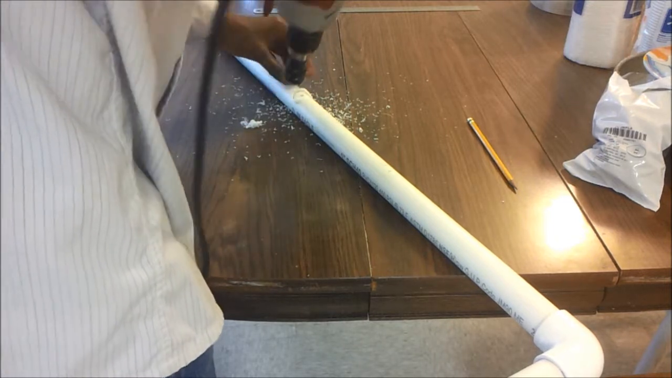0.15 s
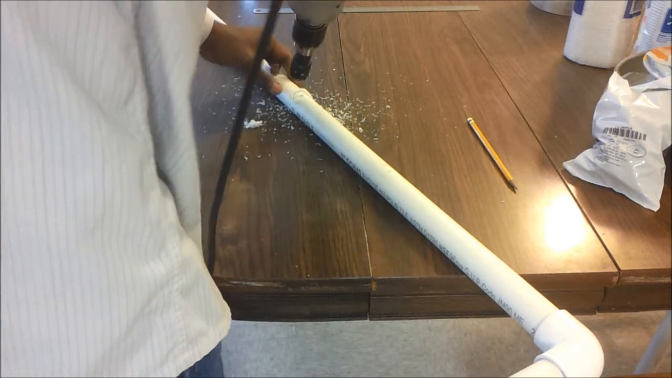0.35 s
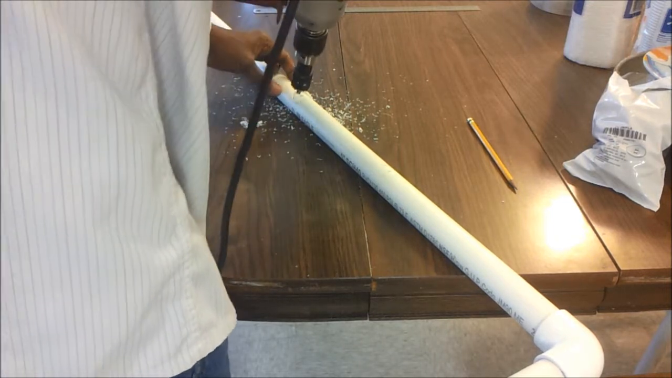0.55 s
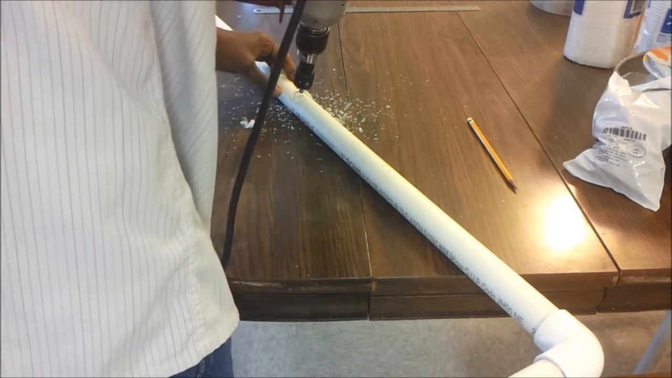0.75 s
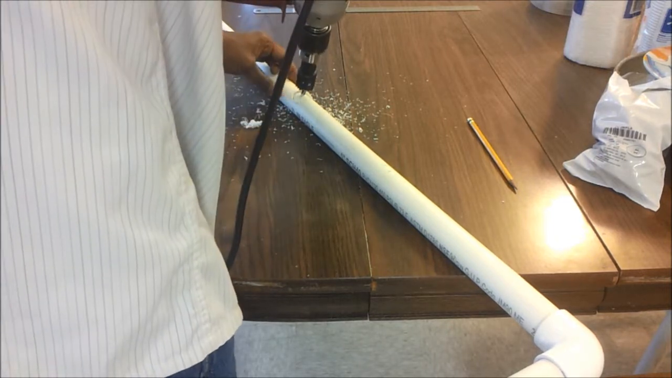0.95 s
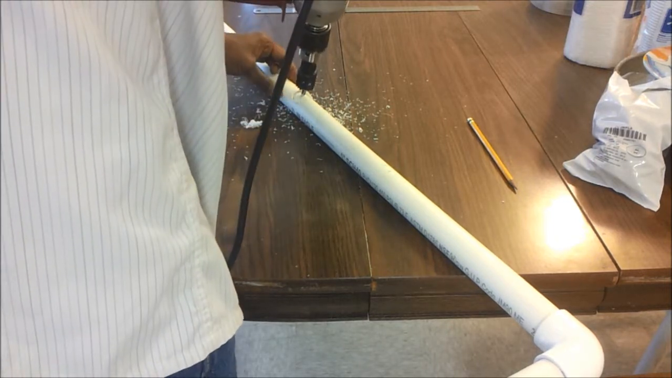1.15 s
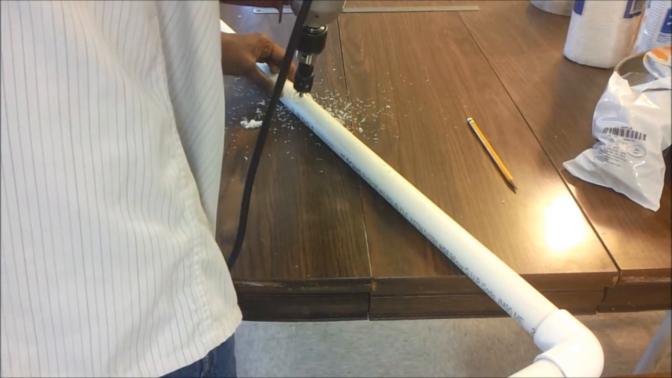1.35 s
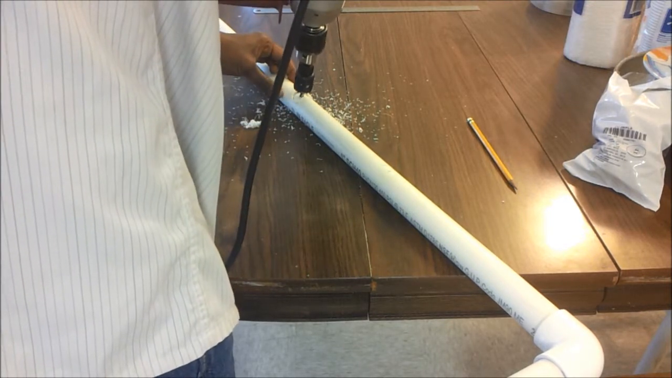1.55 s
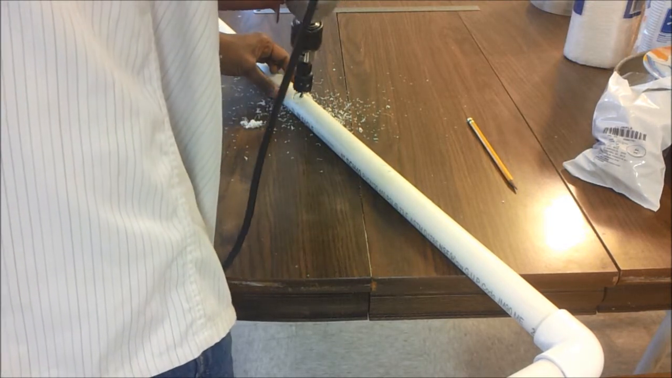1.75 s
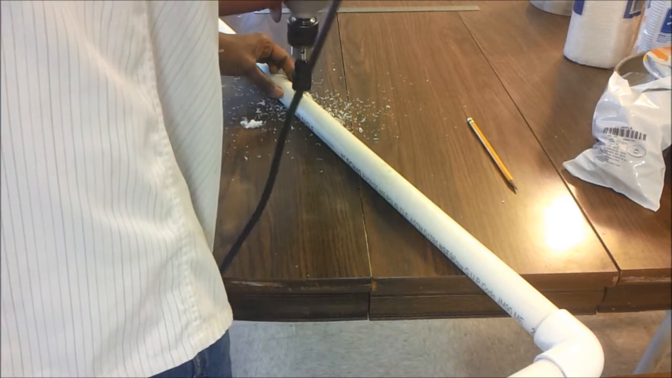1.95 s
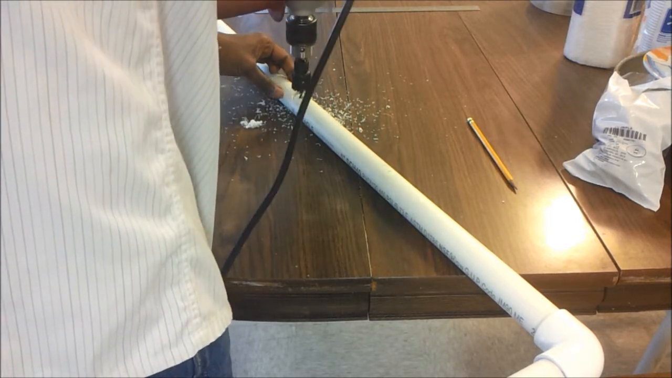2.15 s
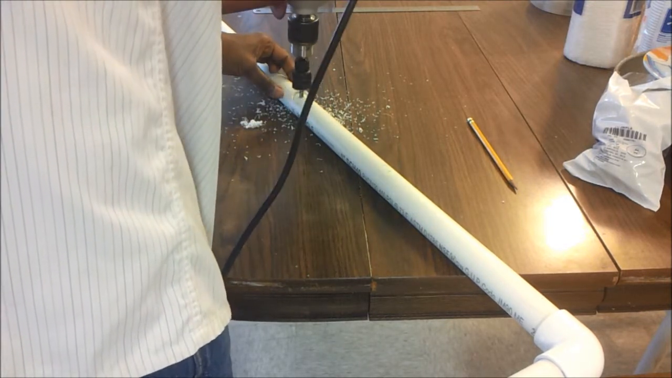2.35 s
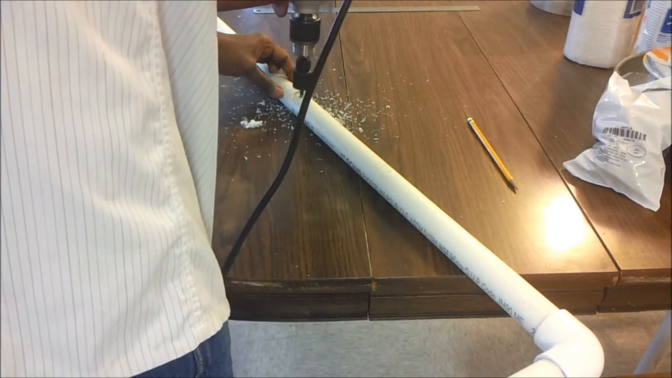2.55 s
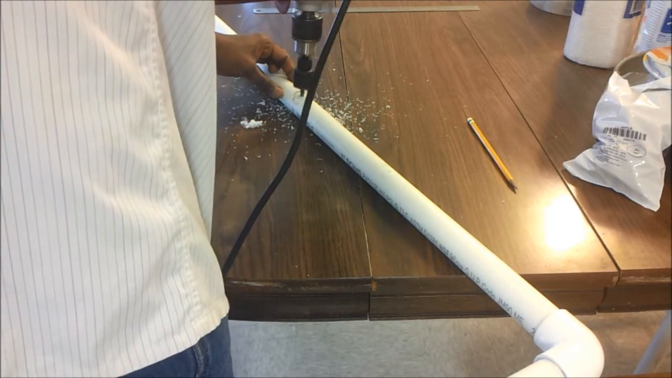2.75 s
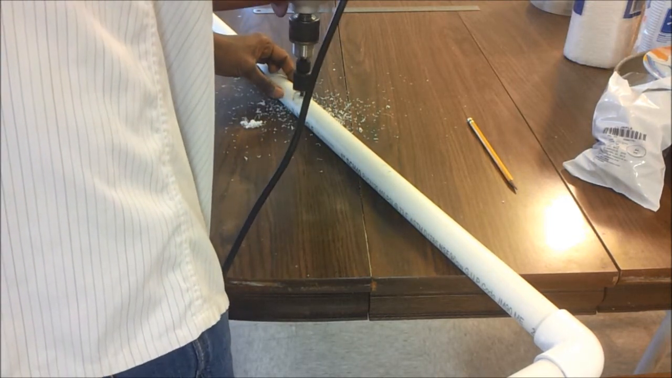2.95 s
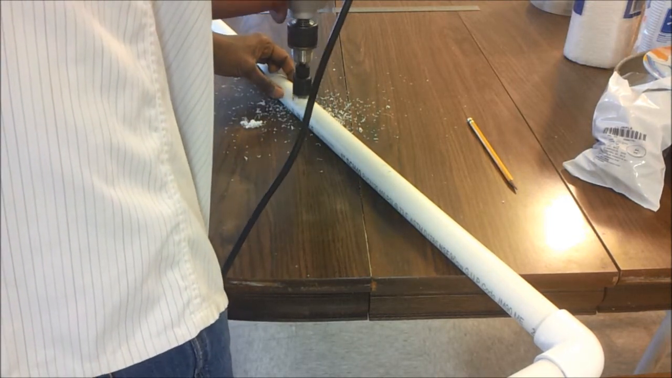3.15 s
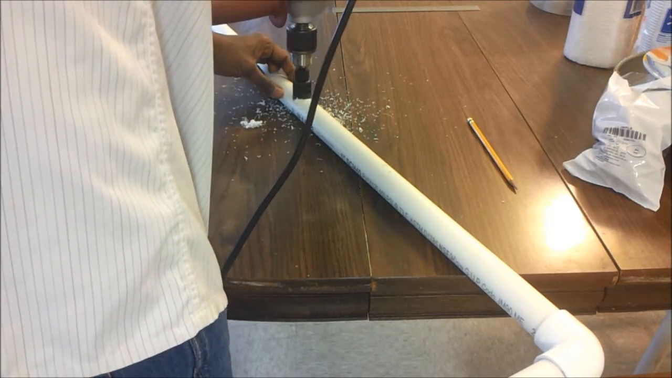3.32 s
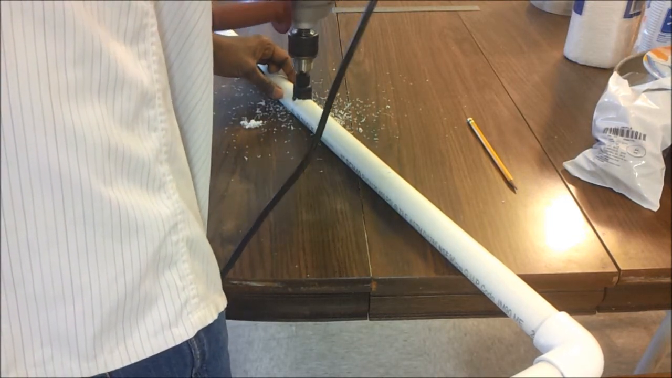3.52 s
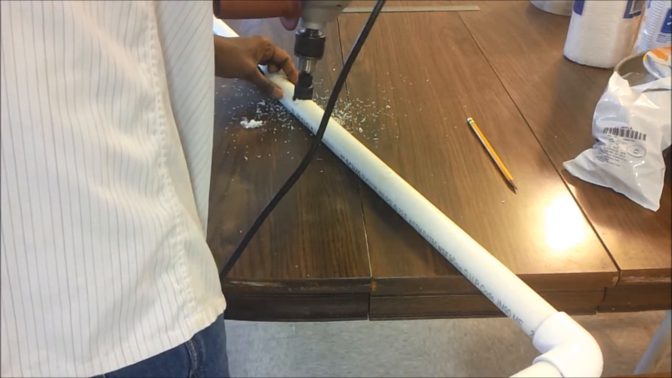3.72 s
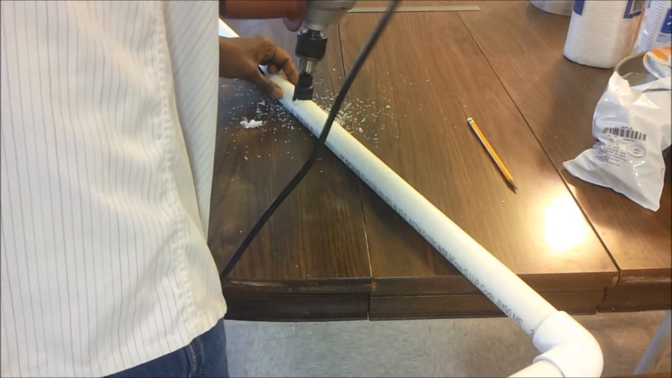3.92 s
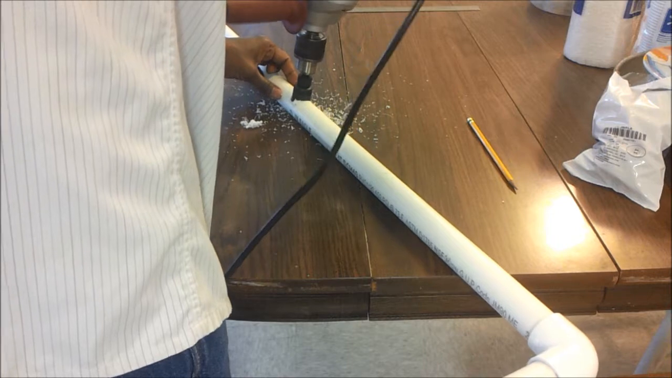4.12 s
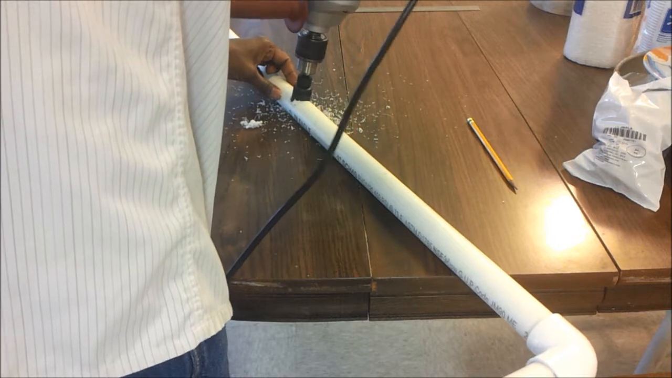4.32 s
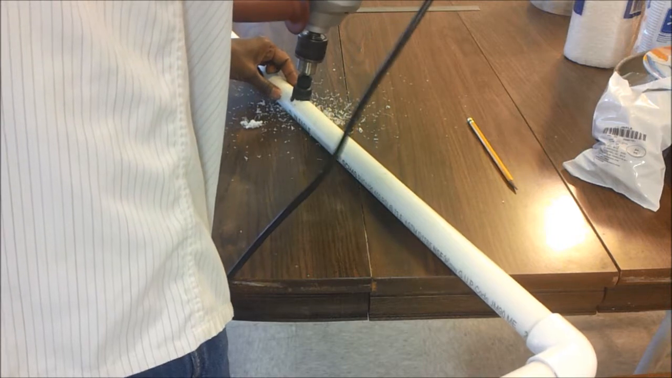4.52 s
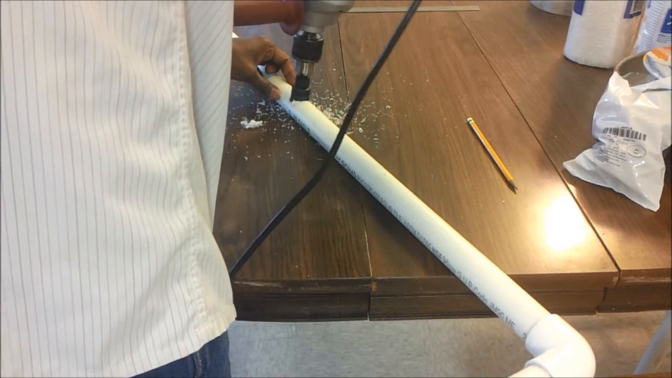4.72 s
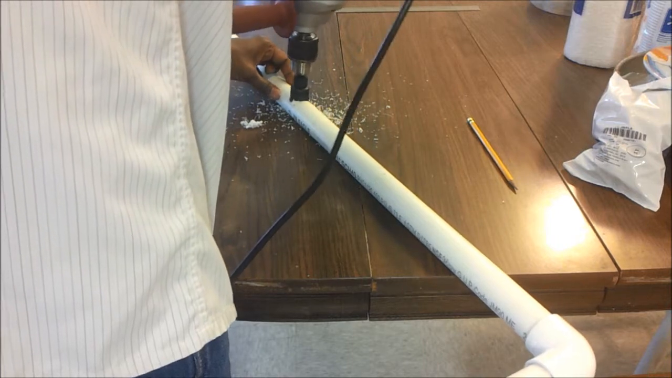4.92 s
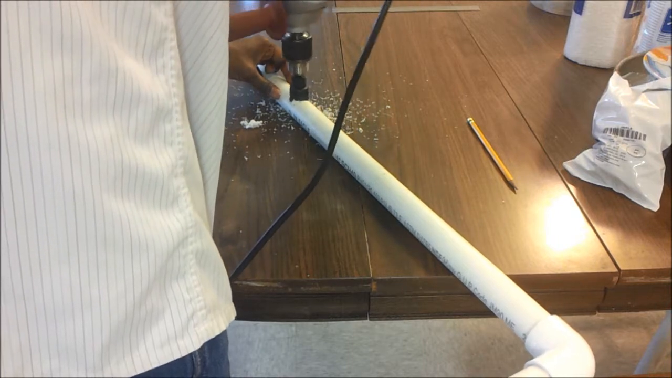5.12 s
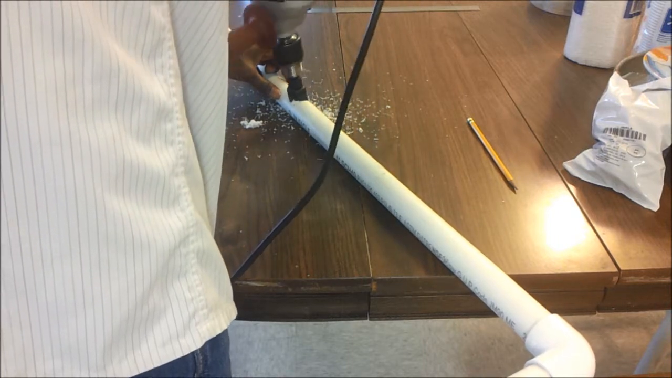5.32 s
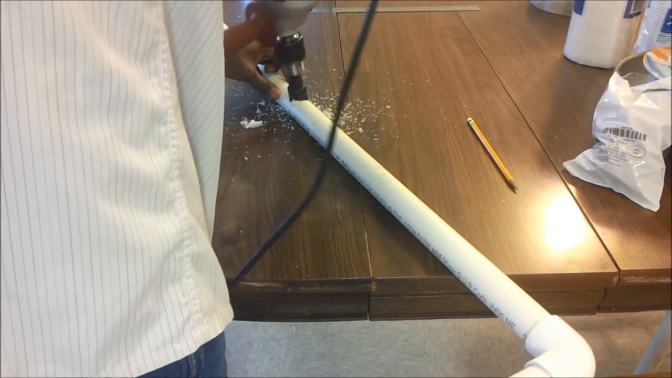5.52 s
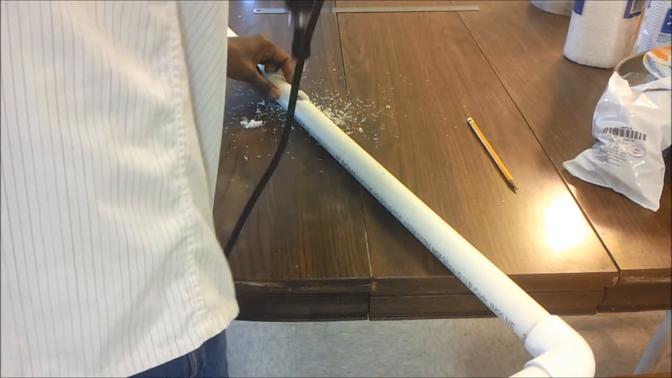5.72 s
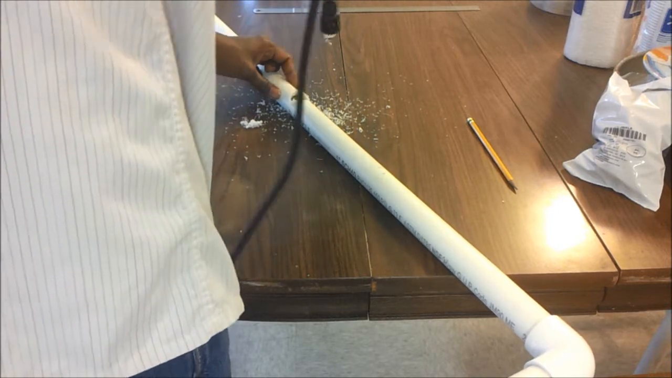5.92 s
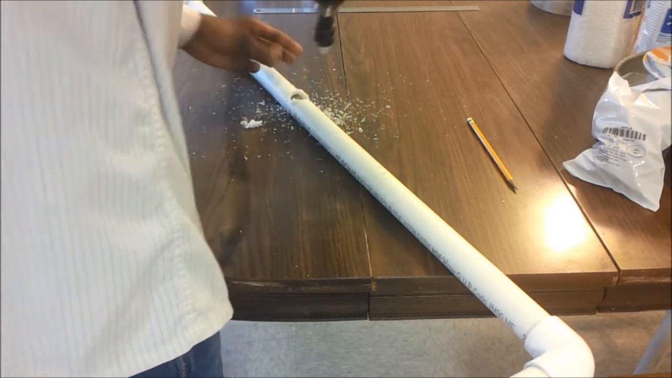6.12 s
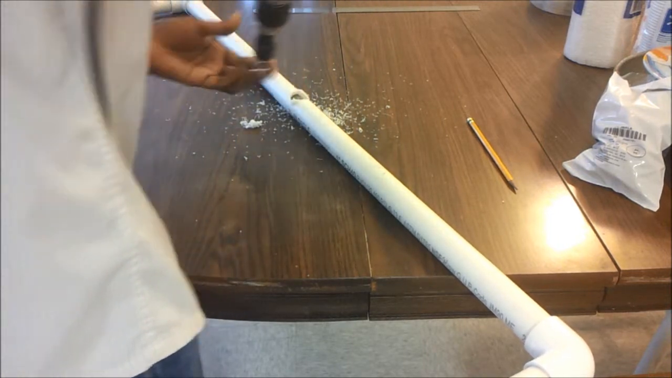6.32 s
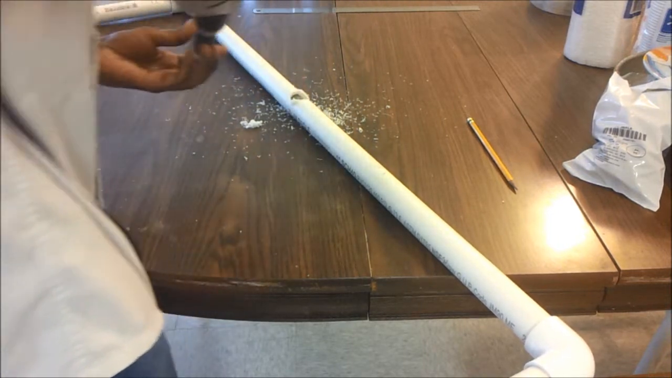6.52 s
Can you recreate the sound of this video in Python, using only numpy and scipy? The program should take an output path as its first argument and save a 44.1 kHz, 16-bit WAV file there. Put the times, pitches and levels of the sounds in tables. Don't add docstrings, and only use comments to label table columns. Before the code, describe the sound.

After two quiet seconds of faint bumps, a corded drill whines up, saws raspily through plastic pipe, then coasts down to a sharp trigger click.

```python
import sys
import numpy as np
from scipy import signal
from scipy.fft import rfft, irfft
from scipy.io import wavfile

SR = 44100
rng = np.random.default_rng(int(sys.argv[2]) if len(sys.argv) > 2 else 0)


def linear_from_db(decibels):
    return 10 ** (np.asarray(decibels, float) / 20)


def waveform_to_disk(signal):
    frames = np.transpose(np.atleast_2d(signal))
    scaled = np.clip(frames, -1, 1) * 32767
    samples = np.round(scaled).astype(np.int16)
    wavfile.write(sys.argv[1], SR, samples)


N = 289737
T = np.arange(N) / SR
MAINS_HZ = 60.36
POWER_ON_S, BITE_S, POWER_OFF_S = 2.0908, 3.18, 5.4
POWERED = np.clip((POWER_OFF_S - T) / 0.016, 0, 1)
CUTTING = POWERED * np.clip((T - BITE_S) / 0.034, 0, 1)
DRIVEN = np.clip((POWER_OFF_S + 0.1 - T) / 0.064, 0, 1)


def evened(x):
    return x / np.sqrt(np.mean(x ** 2) + 1e-20)


def read(points, hz):
    f, value = np.transpose(points)
    return np.interp(np.log(hz + 1), np.log(f + 1), value)


def curves(rows):
    s, *columns = np.transpose(rows)
    return [np.interp(T, s, c) for c in columns]


def body(spectrum, modes):
    hz = abs(np.fft.fftfreq(8192, 1 / SR))
    lift = 1 + sum((linear_from_db(db) - 1) / (1 + (2 * (hz - f) / w) ** 2) for f, w, db in modes)
    gain = linear_from_db(np.maximum(read(spectrum, hz), -90)) * np.maximum(lift, 1e-3)
    minimum_phase = np.exp(np.conj(signal.hilbert(np.log(gain))))
    taps = np.fft.ifft(minimum_phase).real[:4096]
    return taps / np.linalg.norm(taps)


def through(x, taps):
    return signal.oaconvolve(x, taps)[:N]


def band_noise(low_hz, high_hz, count):
    sos = signal.butter(2, [low_hz, high_hz], "band", fs=SR, output="sos")
    return signal.sosfilt(sos, rng.standard_normal(count))


def drift(hz):
    count = N // 64 + 2
    z = rfft(rng.standard_normal(count))
    slow = irfft(z / (1 + (np.fft.rfftfreq(count, 64 / SR) / hz) ** 2), count)
    return evened(np.interp(T, np.arange(len(slow)) * 64 / SR, slow - slow.mean()))


def grit(spread_db):
    return evened(rng.standard_normal(N) * linear_from_db(spread_db * np.minimum(rng.exponential(1, N), 5)))


def add(mix, s, sound):
    part = mix[round(s * SR):][:len(sound)]
    part += sound[:len(part)]


def span(start, end):
    settle_s = .021
    return np.clip(np.minimum(T - start, end - T) / settle_s + .5, 0, 1)


def law(tooth_hz, knee_hz, db, db_per_decade):
    return db + db_per_decade * np.log10(np.minimum(tooth_hz / knee_hz, 1))


def blend(driven, coasting):
    return DRIVEN * driven + (1 - DRIVEN) * coasting


# f/Hz, density/dB per Hz
FLOOR = [(15, -34), (25, -41.5), (117, -5.5), (332, -5.5), (369, -11), (612, -14.5), (1020, -20),
         (1100, -27), (1360, -23.5), (1600, -33), (1780, -25), (2320, -26.5), (14600, -31.5)]


def floor():
    level_db = -58.5
    noise = through(rng.standard_normal(N), body(FLOOR, [(320, 130, 0.5)]))
    low = signal.sosfilt(signal.butter(2, 600, fs=SR, output="sos"), noise)
    return linear_from_db(level_db) * (noise + low * (linear_from_db(1.0 * drift(4.6)) - 1))


# f/Hz, width/Hz, lift/dB
PIPE = [(426.6, 16, 7.4), (514, 26, 3.1), (904, 71, 3), (1118, 34, 4.4), (1560, 38, 1.7), (2080, 55, 1.9)]
# f/Hz, level/dB
JOLT = [(150, -28.5), (300, -4), (450, -4), (900, -4.5), (1550, -.5), (2200, -5), (3000, -44), (5000, -78)]
# t/s, level/dB, brightness share/0-1, t60/s
JOLTS = [
    (0, -66, 0.6, 0.95),
    (3.196, -20, 0.93, 0.21),
    (3.327, -15.5, 1, 0.12),
    (3.437, -23.5, 0.13, 0.16),
    (4.697, -16, 0.32, 0.37),
    (5.459, -31, 0.03, 0.18),
    (5.619, -68, .05, 0.096),
    (6.322, -44, 0.86, 0.33),
    (6.323, -38, 0.88, 0.056),
]
# t/s, level/dB, f/Hz
BUMPS = [(0.231, -55, 170), (0.359, -49, 282), (0.598, -56.5, 325), (0.668, -53, 320), (1.11, -58, 320),
         (1.249, -58, 220), (1.422, -57, 229), (1.689, -62, 300), (5.41, -40, 55), (3.441, -26, 430),
         (5.469, -31.5, 422), (5.52, -42.5, 403), (5.868, -43, 2950), (5.97, -46, 2950)]
# t/s, level/dB
NUDGES = [(0.1246, -49.5), (0.2666, -57), (0.715, -56), (0.858, -57), (1.054, -50), (1.3535, -50.5),
          (1.565, -59), (1.6696, -70), (1.8552, -59)]


def pipe():
    out, t = np.zeros(N), T[:SR // 4]
    ring = body(JOLT, [(f, w, db + 0.5) for f, w, db in PIPE])
    shake = body(RATTLE, HOUSING)
    for s, db, bright, t60 in JOLTS:
        blow = linear_from_db(db - 60 * t / t60) * rng.standard_normal(len(t))
        add(out, s, signal.oaconvolve(blow, (1 - bright) * ring + bright * shake))
    bore_modes = [(f, 3.3 * w, 18.0) for f, w, db in PIPE[3:5]]
    hollow = body([(700, -52), (1000, -3), (1700, -5), (2400, -21)], bore_modes)
    out += linear_from_db(-73.5 + 2.1 * drift(3.8)) * through(rng.standard_normal(N), hollow)
    for s, db, hz in BUMPS:
        thud = evened(band_noise(0.95 * hz, 1.23 * hz, len(t)))
        add(out, s, linear_from_db(db - 60 * t / 0.19) * (1 - np.exp(-t / 0.0012)) * thud)
    for s, db in NUDGES:
        swell = linear_from_db(db - 8.5 - 60 * t / 0.35) * (1 - np.exp(-t / 0.0077))
        add(out, s, signal.oaconvolve(swell * rng.standard_normal(len(t)), hollow))
    return out


# f/Hz, t60/s
ROOM = [(200, 1), (1000, 0.98), (4000, 0.66), (9000, 0.45), (14000, 0.73)]


def room(x):
    taps = np.zeros(SR // 2)
    at = np.arange(300, len(taps) - 20, 20)
    taps[at + rng.integers(0, 20, len(at))] = rng.choice([-1., 1.], len(at))
    hz, t, z = signal.stft(taps, SR, nperseg=256)
    decay = linear_from_db(-60 * t / read(ROOM, hz)[:, None])
    tail = signal.istft(z * decay, SR, nperseg=256)[1]
    return signal.fftconvolve(x, tail / np.linalg.norm(tail))[:N]


# t/s, level/dB
SWITCH = [
    (2.0692, -36.5),
    (6.3174, -20),
]
# f/Hz, level/dB, t60/s
PRESS = [(5700, -3, 0.012), (7000, -2, 0.016), (7940, 0, 0.016), (9100, -1, 0.013), (10100, -7, .013),
         (11430, -14, 0.0081), (12350, -13, 0.014), (13800, -14, .012)]
# f/Hz, level/dB, t60/s
LET_GO = [(3300, -4, .02), (3850, -.5, .024), (4350, -.5, .024), (4750, -5, .02), (5300, -9, .018),
          (5900, -7, .016), (7817, -1.5, .026), (9065, -10, .014), (10000, -13, .01), (10970, -12, .012),
          (12200, -17, .01), (13400, -19, .01)]
# t/s, level/dB, f/Hz
TICKS = [
    (0.7637, -60, 3300),
    (1.2557, -53, 2950),
    (1.452, -57, 3500),
    (1.709, -52, 2800),
    (2.1489, -49, 3170),
    (6.4687, -41, 2620),
    (6.5654, -44.5, 2260),
]


def clicks():
    out, t = np.zeros(N), T[:4000]
    for (s, db), modes in zip(SWITCH, (PRESS, LET_GO)):
        snap = sum(linear_from_db(d - 60 * t / min(t60, .015)) * np.sin(2 * np.pi * (f * t + rng.random()))
                   for f, d, t60 in modes)
        snap = snap * (1 - np.exp(-t / .0003))
        snap = snap / abs(snap).max()
        add(out, s, linear_from_db(db) * snap)
        add(out, s + .008, linear_from_db(db - 14) * snap)
    for s, db, hz in TICKS:
        add(out, s, linear_from_db(db + 4.0 - 60 * t / 0.064) * band_noise(.6 * hz, 1.9 * hz, len(t)))
    return out


def kicks(count=3):
    level_db, fade_db, t60_s = -45, -1.5, .022
    out, t = np.zeros(N), T[:2000]
    for k in range(count):
        spark = evened(band_noise(2600, 12500, len(t)))
        add(out, POWER_ON_S + k / MAINS_HZ, linear_from_db(level_db + fade_db * k - 60 * t / t60_s) * spark)
    return out


# t/s, tooth rate/Hz
SPEED = [(2.08, 60), (2.2, 400), (2.5, 1150), (2.8, 1500), (3.1, 1900), (3.3, 2110), (3.5, 2125),
         (3.75, 2180), (3.94, 2160), (4.07, 2080), (4.68, 2095), (4.76, 2170), (5.0, 2285), (5.13, 2245),
         (5.25, 1940), (5.3, 2150), (5.36, 2430), (5.43, 2950)]


def shaft():
    friction_hz_per_s, drag_s = 2217, 3.
    s, hz = SPEED[-1]
    stall = friction_hz_per_s * drag_s
    coast = (hz + stall) * np.exp(-(T - s) / drag_s) - stall
    return np.where(T < s, curves(SPEED)[0], np.maximum(coast, 30))


def runout(tooth_hz, pressure):
    teeth_per_turn = 67.5
    depth_db = blend(0.94 + 1.5 * pressure, 1.3)
    chuck = 2 * np.pi * np.cumsum(tooth_hz) / SR / teeth_per_turn
    return linear_from_db(depth_db * (np.sin(chuck) + 0.57 * np.sin(2 * chuck + 1) + 0.75 * drift(30.5)))


def torque(tooth_hz):
    steady, at_crawl, crawl_hz = 0.18, 0.52, 300
    flicker = np.clip(POWERED * (steady + at_crawl * np.exp(-tooth_hz / crawl_hz)), 0, 1)
    cycle = (T - POWER_ON_S) * MAINS_HZ % 1
    return 1 - flicker + 1.6 * flicker * np.exp(-cycle / 0.23)


# f/Hz, width/Hz, lift over surroundings/dB
HOUSING = [(2638, 240, 6.5), (3301, 84, 9), (3890, 55, 6.5), (4460, 610, 3.5), (6000, 200, 4),
           (7440, 67, 4), (7880, 130, 2), (9490, 410, 7)]


def shell(drive, loaded, free, load):
    loose_modes = [(f, w, 0.43 * db) for f, w, db in HOUSING]
    tight = through(drive * load, body(loaded, HOUSING))
    return tight + through(drive * (1 - load), body(free, loose_modes))


# t/s, lift/dB
SNATCHES = [(2.52, 3.5), (2.77, 1.5), (3.4, 4.5), (3.78, 2.1), (3.93, 3.5), (4.0, 2.5), (4.04, 1.5),
            (4.16, 1.5), (4.51, 1), (4.59, 1), (4.91, 2.1), (3.24, -0.5), (4.33, 0.5), (4.44, 1.5),
            (5.15, 1), (5.329, -1), (5.38, 2.5)]


def gear_gain(motor_db, pressure):
    pressure_db, snatch_s, rasp_db, rasp_hz = 7.5, 0.0216, .9, 9
    snatch_db = sum(db * np.exp(-((T - s) / snatch_s) ** 2) for s, db in SNATCHES)
    return linear_from_db(motor_db + pressure_db * pressure + snatch_db + rasp_db * CUTTING * drift(rasp_hz))


# f/Hz, density/dB per Hz
RATTLE = [(1000, -43), (1700, -18.5), (3310, -5.5), (4300, -3.5), (5120, -9), (6000, -10), (7800, -23.5),
          (11800, -58), (12400, -19), (13300, -18.5), (14300, -61)]
# f/Hz, density/dB per Hz
FREE = [(1000, -37), (1700, -11.5), (2280, -4.5), (2690, -1), (3060, -1.5), (4300, 1), (4730, -6.5),
        (5600, -9), (7280, -39), (12300, -120)]


def rattle(wobble, current):
    return shell(grit(3.35) * wobble * current, RATTLE, FREE, CUTTING)


# f/Hz, level/dB
WHINE = [(300, 3), (2000, -2.5), (4300, 1.5), (5600, 5.5), (8500, 3.5), (10500, -7), (12000, -17),
         (14000, -32)]
# multiple of tooth rate, level/dB
UPPER = [(3, -4.5), (4, 2.5), (4.9, 6), (6, 9), (7.3, -25), (8, 4)]
# knee/Hz, level there/dB, slope/dB per decade
WHINE_POWERED = (2100, -9, 85)
# from t/s, to t/s, from level/dB, to level/dB
SING = (4.02, 4.71, 6, 11.5)
# speed/Hz, spread/Hz, level/dB
SLACK = [(2300, 300, -9.5), (1850, 165, -4.5), (2400, 270, -1.5)]


def whine(tooth_hz):
    first_db, free_db, cutting_db = -14, 0.5, -10
    through_s, through_db = 5.29, -9
    main, first, upper = (db - np.minimum(abs(tooth_hz - hz) / spread, 6) ** 2 for hz, spread, db in SLACK)
    driven_db = np.maximum(law(tooth_hz, *WHINE_POWERED), -40) + through_db * span(through_s, 9)
    whine_db = blend(driven_db, main)
    sing_db = span(*SING[:2]) * np.interp(T, SING[:2], SING[2:])
    first_db = blend(first_db + sing_db, first - main)
    upper_db = free_db + (cutting_db - free_db) * np.minimum(tooth_hz / 2100, 1) ** 6
    upper_db = blend(upper_db, upper - main)
    orders = [(1, first_db), (3 / 2, -7.5), (2, 0)] + [(k, db + upper_db) for k, db in UPPER]
    slack = 1 - POWERED
    tone, waver = np.zeros(N), .003 + .005 * slack
    for k, db in orders:
        turn = 2 * np.pi * np.cumsum(k * tooth_hz * (1 + waver * drift(62.8))) / SR
        level = linear_from_db(db + (2.8 + 1.2 * slack) * drift(18))
        tone += level * np.sin(turn) * (k * tooth_hz < 15000)
    return linear_from_db(whine_db) * through(tone, body(WHINE, HOUSING))


# f/Hz, density/dB per Hz
HISS = [(2650, -29.5), (4500, -21.5), (5660, -5), (6860, -2), (7940, 0.5), (9020, .5), (10300, -5),
        (11300, -8), (13000, -13.5), (14200, -30.5)]
# f/Hz, density/dB per Hz
FAN = [(2650, -28.5), (4500, -22.5), (5660, -2.5), (7940, 3.5), (9500, -1.5), (11300, -10), (12000, -19.5),
       (14500, -23)]
# knee/Hz, level over motor there/dB, slope/dB per decade
HISS_POWERED = (790, 0.77, 27)
HISS_COASTING = (2300, 6.1, 8)


def hiss(motor_db, tooth_hz, wobble, current):
    spark_db, spark_t60_s = -46, 0.2
    hiss_db = motor_db + blend(law(tooth_hz, *HISS_POWERED), law(tooth_hz, *HISS_COASTING))
    sparks = linear_from_db(spark_db - 60 * abs(T - POWER_ON_S) / spark_t60_s)
    noise = shell(grit(2.8) * wobble ** 0.86 * current, HISS, FAN, POWERED)
    return (linear_from_db(hiss_db) + sparks) * noise


# t/s, level/dB
BUZZ = [
    (2.09, -71),
    (2.15, -56),
    (2.3, -55),
    (2.5, -64),
    (5.2, -66),
    (5.33, -42),
    (5.39, -51),
]
# multiple of mains, level/dB
BUZZ_ORDERS = [(5, -7), (7, 4.5), (9, -2.5), (15, -31)]


def buzz():
    tones = sum(linear_from_db(db + 2.0 * drift(44)) * np.sin(2 * np.pi * k * MAINS_HZ * T) for k, db in BUZZ_ORDERS)
    return POWERED * linear_from_db(curves(BUZZ)[0]) * tones


# from t/s, to t/s, hum level/dB, bite lift/dB
HUM_SPANS = [(2.08, 2.46, -67, .1), (2.574, 2.62, -61, 1), (2.743, 2.785, -59, 2.5), (2.863, 2.92, -56, 0.2),
             (3.21, 3.66, -49, 3), (4.005, 4.143, -45, -1.5), (4.2, 4.52, -49, -0.1),
             (4.922, 5.022, -52, 3.5), (5.078, 5.4, -53.5, 2), (5.385, 5.61, -60, 2)]


def hum():
    rumble = through(rng.standard_normal(N), body([(95, -44.5), (125, 4.5), (145, 1.5), (200, -20)], []))
    tone = np.sin(2 * np.pi * (2 * MAINS_HZ * T + 0.079 * drift(5.7))) * linear_from_db(2.3 * drift(7.8))
    hum_level = sum(linear_from_db(db) * span(a, b) for a, b, db, lift in HUM_SPANS)
    return hum_level * (.5 * POWERED * tone + 1.2 * rumble)


# f/Hz, density/dB per Hz
BITE = [(120, -38), (200, -10.5), (280, -7), (430, -5.5), (597, -5.5), (883, 0.5), (1350, -5), (2400, -4.5),
        (3120, -11), (5280, -88.5)]
# knee/Hz, level over motor there/dB, slope/dB per decade
BITE_POWERED = (3600, -5.5, 7.45)
BITE_COASTING = (2630, .3, 27)


def bite(motor_db, tooth_hz, wobble):
    bite_db = motor_db + blend(law(tooth_hz, *BITE_POWERED), law(tooth_hz, *BITE_COASTING))
    bite_db = bite_db + sum(lift * span(a, b) for a, b, db, lift in HUM_SPANS)
    return linear_from_db(bite_db) * through(grit(2.4) * wobble ** 0.56, body(BITE, PIPE))


# t/s, motor level/dB, pressure/0-1
EFFORT = [(2.09, -54, 0), (2.15, -52, 0), (2.26, -40, 0.25), (2.44, -33, 0.13), (2.8, -31, 0.14),
          (3.15, -27.5, 0), (3.26, -26, 0.16), (3.6, -25, 0.32), (3.9, -25, 0.53), (4.3, -25, 0.51),
          (4.85, -25.5, 0.31), (5.05, -26.5, 0), (5.15, -25.5, 0.26), (5.36, -27.5, 0.6), (5.51, -41.5, 0),
          (5.65, -43.5, 0), (6.3, -52.5, 0.1), (6.56, -61, 0)]


def drill():
    motor_db, pressure = curves(EFFORT)
    tooth_hz = shaft()
    on = np.clip((T - POWER_ON_S) / 0.0028, 0, 1)
    wobble, current = runout(tooth_hz, pressure), torque(tooth_hz)
    gears = gear_gain(motor_db, pressure) * (rattle(wobble, current) + whine(tooth_hz))
    brushes = hiss(motor_db, tooth_hz, wobble, current)
    return on * (gears + brushes + buzz() + hum() + bite(motor_db, tooth_hz, wobble))


def scene():
    steady, sudden = drill(), pipe() + clicks() + kicks()
    echo = room(linear_from_db(-5) * steady + linear_from_db(-7.0) * sudden)
    mono = steady + sudden + echo + floor()
    return np.array([mono, mono])


# f/Hz, level under the whole sound/dB
MASK = [(40, -37), (90, -37), (130, -39), (300, -38.5), (420, -70), (9800, -70), (11000, -48),
        (11800, -42.5), (14500, -42.5)]


def masked(x):
    hz, t, z = signal.stft(x, SR, nperseg=2048)
    power = abs(z[:1024]) ** 2
    bands, band_hz = power.reshape(256, 4, -1).mean(1), hz[2:1024:4, None]
    patchy_db = np.repeat(rng.standard_normal((64, len(t))), 4, axis=0) * 3.0 * (band_hz > 5000)
    keep = bands > power.sum(0) * linear_from_db(read(MASK, band_hz) + patchy_db) ** 2
    z[:1024] *= np.repeat(keep, 4, axis=0)
    return signal.istft(z, SR, nperseg=2048)[1][:N]


def low_pass(x):
    return signal.sosfilt(signal.butter(12, 14820, fs=SR, output="sos"), x)


def record(dry):
    mono = masked(0.83 * np.tanh(dry[0] / 0.95))
    return low_pass(np.array([mono, mono]))


dry = scene()
out = record(dry)
waveform_to_disk(out)
```